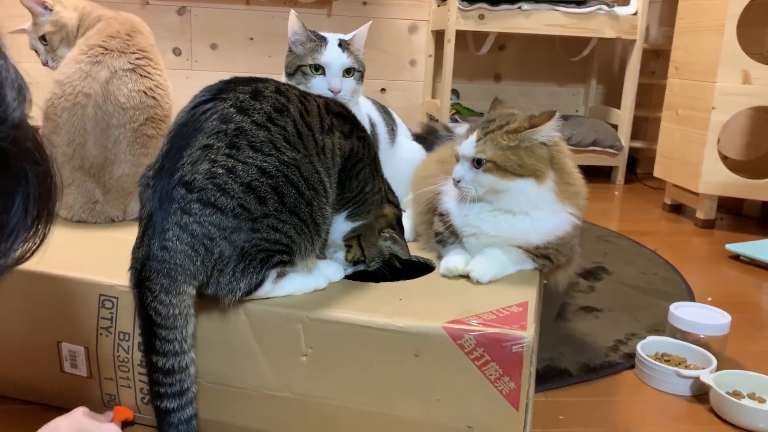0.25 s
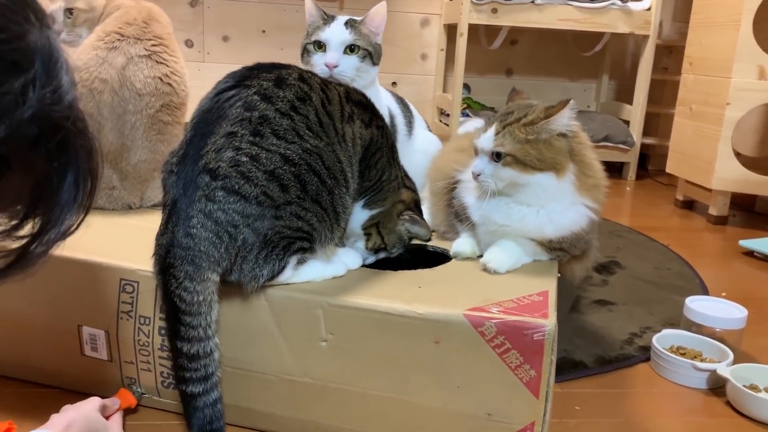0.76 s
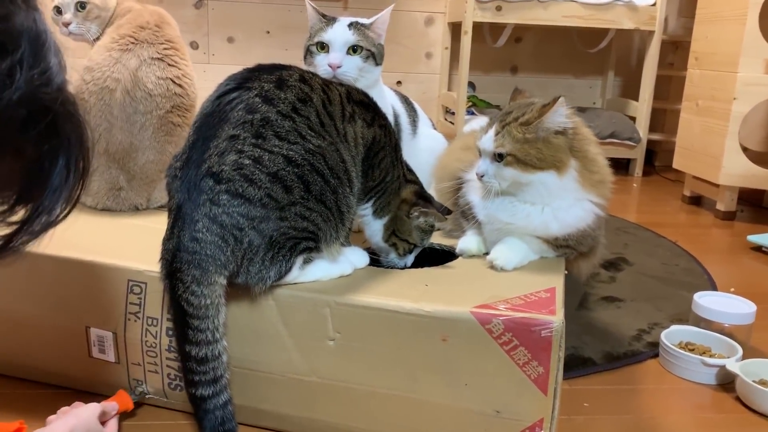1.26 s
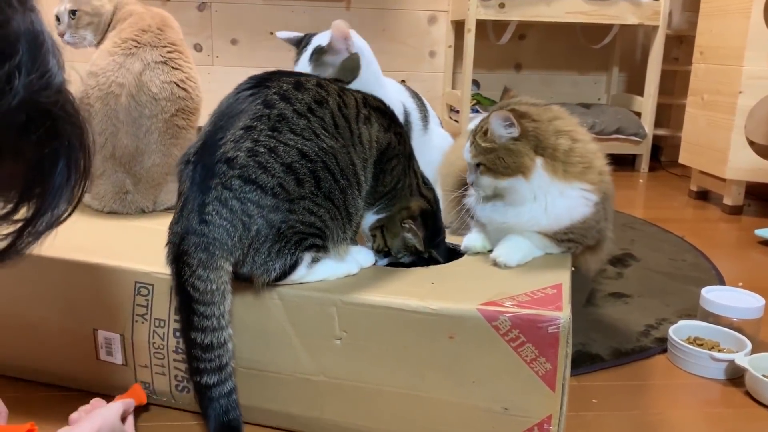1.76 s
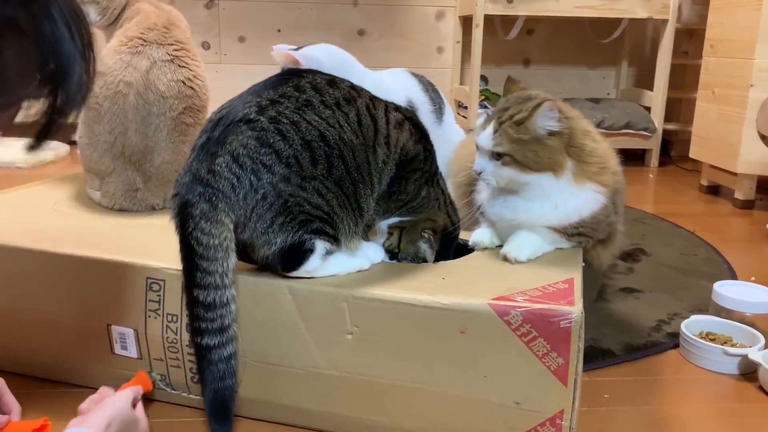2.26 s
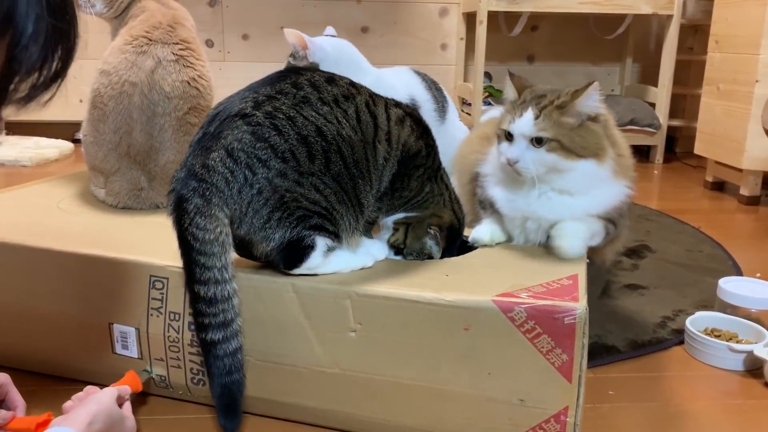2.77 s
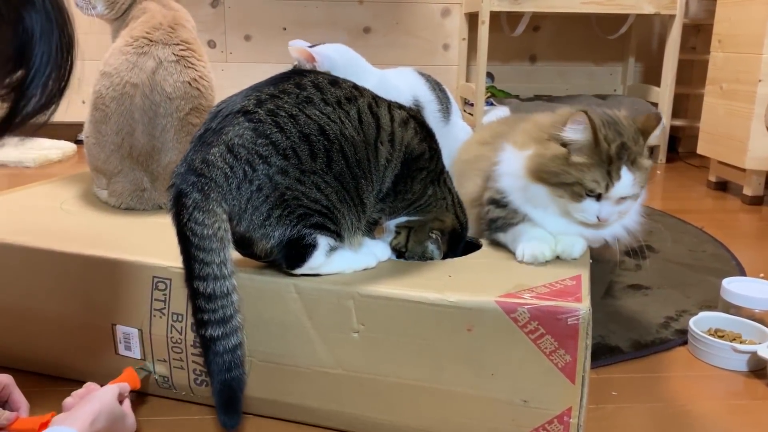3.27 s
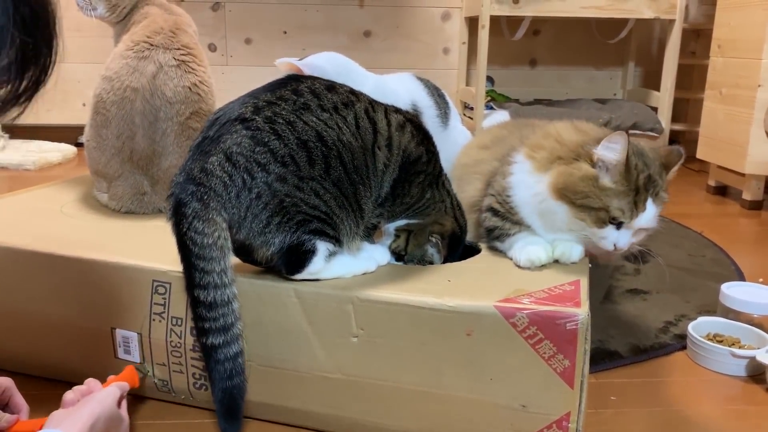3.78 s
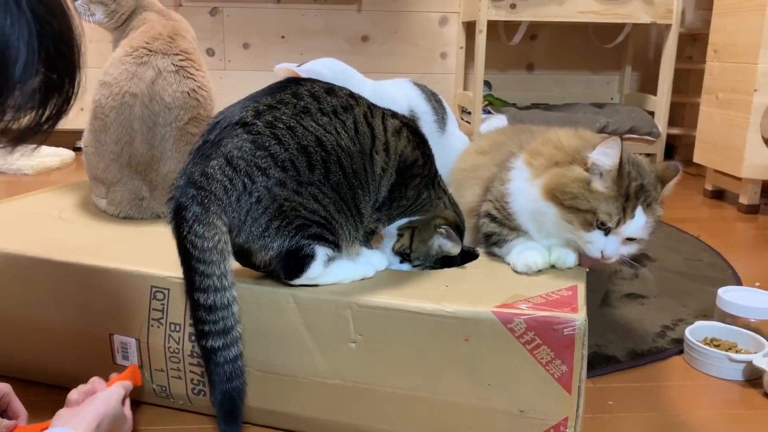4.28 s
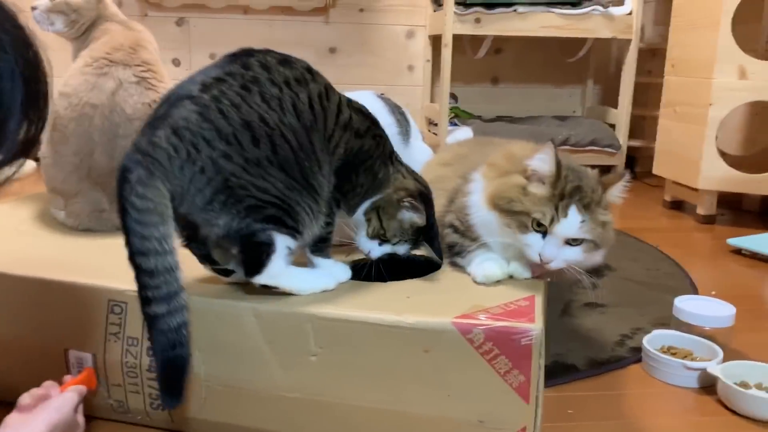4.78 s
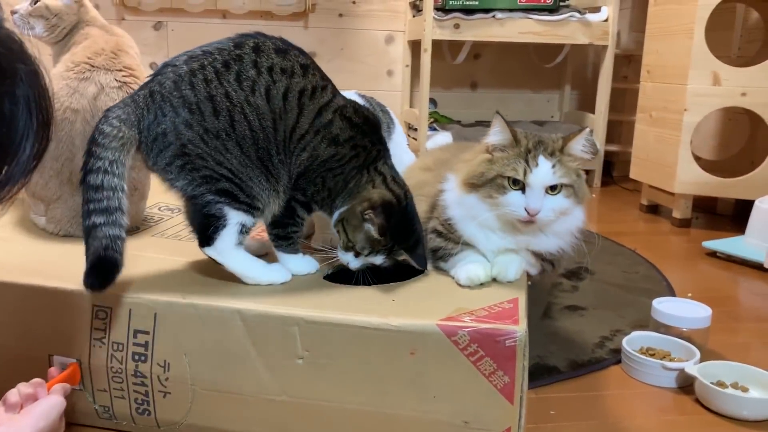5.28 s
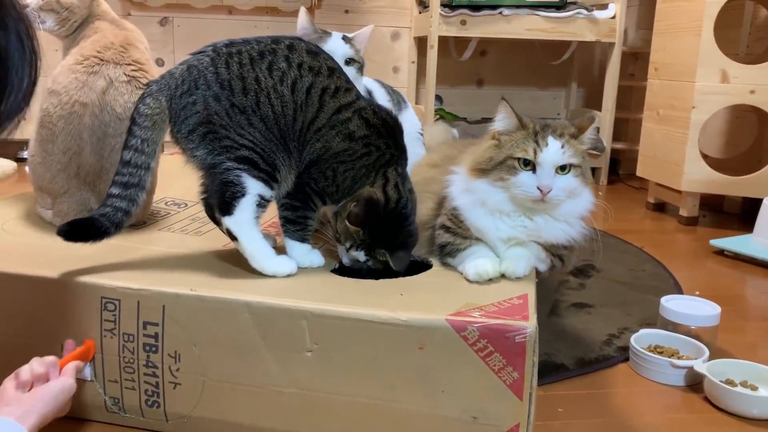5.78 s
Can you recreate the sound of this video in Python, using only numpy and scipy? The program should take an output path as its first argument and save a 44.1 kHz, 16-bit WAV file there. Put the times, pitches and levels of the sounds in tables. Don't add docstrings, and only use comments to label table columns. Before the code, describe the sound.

A toy wand poked into a large cardboard box is dragged to and fro over its ribs in short irregular strokes. Each gives a quick rasping zip with papery hiss; snags pop, fibres snap, and the hollow box booms underneath. Thuds against the wall grow frequent after the first second. Close stereo microphone, small wooden room with faint reverberation, light brushing and soft room noise.

```python
import sys
import numpy as np
from scipy import signal
from scipy.fft import rfft, irfft, next_fast_len
from scipy.io import wavfile
from scipy.ndimage import uniform_filter1d, map_coordinates

SR = 44100
rng = np.random.default_rng(int(sys.argv[2]) if len(sys.argv) > 2 else 0)


def attenuation_scalar(level_db):
    decades = np.asarray(level_db, float) / 20
    return 10 ** decades


def wav_record(signal):
    frames = np.transpose(np.atleast_2d(signal))
    bounded = np.clip(frames, -1, 1)
    quanta = np.round(bounded * 32767).astype(np.int16)
    wavfile.write(sys.argv[1], SR, quanta)


N = 266364


def unit(x):
    return x / np.sqrt(np.mean(x ** 2) + 1e-20)


def along(points, hz):
    f, v = np.transpose(points)
    return np.interp(np.log(hz + 1), np.log(f + 1), v)


def curves(rows):
    s, *cols = np.transpose(rows)
    return [np.interp(np.arange(N) / SR, s, c) for c in cols]


def wobble(rate):
    return map_coordinates(rng.standard_normal(N // 40), [np.arange(N) * rate / SR])


def filtered(x, response):
    m = next_fast_len(N + SR // 2)
    hz = np.fft.rfftfreq(m, 1 / SR)
    return irfft(rfft(x, m) * response(hz), m)[..., :N]


def modes(table):
    def response(f):
        total = 0
        for k, (centre, width, db) in enumerate(table):
            damping = 1j * f * width
            total = total + (-1) ** k * attenuation_scalar(db) * damping / (centre ** 2 - f ** 2 + damping)
        return total
    return response


def colour(spectrum):
    return lambda hz: attenuation_scalar(along(spectrum, hz))


def driven(force, level_db, response):
    return filtered(force * attenuation_scalar(level_db), response) / np.std(filtered(force, response))


def spikes(times, dbs):
    x = np.zeros(N)
    x[np.round(np.asarray(times) * SR).astype(int)] = attenuation_scalar(dbs) * rng.choice([-1, 1], len(times))
    return x


# (frequency [Hz], level [dB per Hz])
ROOM_TONE = [(18, -34), (30, 6), (109, -4), (1070, -27.5), (2900, -41), (9710, -47), (14800, -38),
             (16000, -54)]
# (frequency [Hz], level [dB])
PAPER_COLOUR = [(1200, 3), (1900, 0), (2700, -4.5), (4800, -5.5), (5800, -2.5), (7800, -4), (10000, 2),
                (11700, -4.5), (15500, -5.5)]
# (time [s], level [dB])
BRUSH_LEVEL = [(0.0, -63), (0.16, -44), (0.3, -48.5), (0.92, -50), (0.95, -75), (1.05, -52), (1.408, -57.5),
               (1.956, -54), (2.188, -43), (2.58, -47.5), (2.63, -80.5), (3.08, -57), (3.45, -53.5),
               (3.7, -56), (4.4, -67), (4.49, -52.5), (5.42, -60.5), (6.04, -59.5)]


def background():
    flutter_db = np.clip(7.0 * wobble(33), -5, 5)
    brushing = driven(rng.standard_normal(N), curves(BRUSH_LEVEL)[0] + flutter_db, colour(PAPER_COLOUR))
    return brushing + driven(rng.standard_normal(N), -41, colour(ROOM_TONE))


# (peak time [s], level [dB])
AIR_SHOVES = [(0.0, -21.5), (0.15, -23.5), (0.3, -20.5), (0.479, -21.5), (0.67, -27), (0.8, -32.5),
              (1.1, -20.5), (1.33, -26.5), (1.44, -17), (1.61, -24), (1.77, -22.5), (2.02, -21), (2.2, -25),
              (2.32, -20), (2.56, -30.5), (2.76, -20), (3.041, -26.5), (3.35, -36), (3.5, -23.5),
              (3.59, -18.5), (3.831, -28), (4.05, -20.5), (4.15, -26), (4.39, -31), (4.58, -21),
              (4.93, -23), (5.21, -22), (5.5, -21), (5.76, -18), (6.04, -17.5)]


def boom():
    swell_db_per_s, ring_db_per_s, die_db_per_s2 = 340, 60, 406
    s, db = np.transpose(AIR_SHOVES)[:, :, None]
    coarse = np.arange(0, N, 64)
    since = coarse / SR - s
    decay_db = -ring_db_per_s * since - die_db_per_s2 * since ** 2
    level_db = db + np.where(since < 0, swell_db_per_s * since, decay_db)
    level = np.interp(np.arange(N), coarse, attenuation_scalar(level_db.max(axis=0)))
    pitch_hz = 57 + 2 * wobble(12)
    tone = np.sqrt(2) * np.sin(2 * np.pi * np.cumsum(pitch_hz) / SR)
    shake = driven(rng.standard_normal(N), 0, modes([(41.0, 10.5, 0)]))
    return level * (tone + 0.41 * shake)


# (time [s], peak level [dB])
WALL_SLAPS = [(0.781, -20), (1.075, -21), (1.425, -12), (1.723, -8.5), (1.995, -10), (2.346, -6.5),
              (2.711, -23), (2.757, -9), (3.014, -37), (3.104, -7.5), (3.334, -12), (3.47, -24),
              (3.569, -8.5), (3.849, -11), (4.026, -22), (4.123, -7), (4.569, -20), (4.928, -11),
              (5.116, -26), (5.177, -8), (5.518, -12), (5.732, -34), (5.774, -13.5)]


def slaps():
    s, db = np.transpose(WALL_SLAPS)
    return filtered(spikes(s, db + 47), modes([(107.3, 29.8, 2.67), (133.3, 55.7, -1.7)]))


# (time [s], peak level [dB])
FIBRE_SNAPS = [(0.0754, -18.5), (0.0922, -13), (0.195, -16), (0.3566, -26), (0.4589, -17), (1.0454, -21),
               (1.3668, -23), (1.5728, -19), (1.6826, -16), (1.9354, -30), (1.9789, -14), (2.154, -10.5),
               (2.2857, -12), (2.5861, -27.5), (2.7392, -18), (2.7788, -20.5), (2.7978, -26), (2.8514, -27),
               (4.0258, -18.5), (4.566, -45.5), (5.0097, -32), (5.1244, -13.5), (5.149, -14), (5.1817, -9),
               (5.2094, -15.5), (5.3889, -29), (5.6656, -33), (5.688, -16), (5.7326, -10), (5.9106, -37)]


def snaps():
    s, db = np.transpose(FIBRE_SNAPS)
    bursts = signal.lfilter([1], [1, -.993], np.abs(spikes(s, db - 5.5)))
    return bursts * driven(rng.standard_normal(N), 0, colour(PAPER_COLOUR))


# (frequency [Hz], width [Hz], level [dB])
PANEL_MODES = [
    (115.7, 53.8, 4),
    (220, 100, -0.5),
    (275.3, 104, 4),
    (330, 142.7, 2.5),
    (367, 26.5, 9),
    (488.5, 40, -1.5),
]
# (frequency [Hz], width [Hz], level [dB])
STIFF_MODES = [(624, 76, 6), (781.5, 73.6, 4), (847.5, 93.5, 3), (1068, 113, -1.5), (1388, 207, -9.5),
               (1970, 320, -19)]
# (time [s], panel peak [dB], sharpness [dB])
SNAGS = [(0.104, -4, 5), (0.195, 7, -24), (0.364, -5.5, 7), (0.469, 3, -9), (0.651, -8.5, 1),
         (0.782, -11, -7.5), (1.092, -11, -2.5), (1.39, -6.5, -3), (1.574, 3.5, 3), (1.689, -1, 2.5),
         (1.982, 0.5, -29), (2.153, -5, -8.5), (2.296, -2, 0.5), (3.254, 3.5, -5), (3.792, -5, 2),
         (4.027, -10, 5), (4.056, -8, 3), (4.349, -11, -23), (4.594, -1.5, -30), (4.625, -4, -28.5),
         (4.875, -3, -8), (4.891, 8, -1.5), (5.119, -3, -6), (5.182, -1, 0.5), (5.435, -3, -13),
         (5.457, -9, -8.5), (5.494, 0, -25), (5.687, 4, 2), (5.708, 1, 4.5), (5.741, 1, 6)]


def jolts():
    s, db, sharp_db = np.transpose(SNAGS)
    db = np.minimum(db, -2)
    low = filtered(spikes(s, db + 30.5), modes(PANEL_MODES))
    high = filtered(spikes(s, db + sharp_db + 24), modes(STIFF_MODES))
    return uniform_filter1d(low + high, size=9)


def course(rows, times, shape):
    stiff_over_hiss_db, stiff_db_per_octave, usual_rib_hz = 12.5, -0.5, 280
    lifted_db = -120
    t = np.arange(0, N, 16) / SR
    approach, bite, release = times
    for s, hold, panel_db, hiss_db, rib_hz in rows:
        at = s + np.array([-approach, -bite, 0, hold, hold + release])
        octaves = np.log2(rib_hz / usual_rib_hz)
        stiff_db = hiss_db + stiff_over_hiss_db + stiff_db_per_octave * octaves
        levels = []
        for db, steps in zip((panel_db, stiff_db, hiss_db), shape):
            levels.append(np.interp(t, at, db + np.insert(steps, 2, 0), lifted_db, lifted_db))
        speed = np.insert(1.0 * np.array(shape[3]), 2, 1)
        yield levels + [rib_hz * np.interp(t, at, speed)]


# (bite time [s], hold [s], panel level [dB], paper hiss level [dB], ribs crossed [Hz])
JAB_STROKES = [(0.2, 0.02143, -18, -32, 350.9), (0.467, 0.038, -18.5, -34.5, 282.5),
               (0.785, 0.011, -21.5, -40, 197.3), (1.047, 0.03, -25, -46, 159.7),
               (1.222, .04, -22, -45.5, 260.7), (1.385, 0.056, -17.5, -38, 260),
               (1.688, 0.035, -14.5, -36, 300.5), (1.984, 0.024, -25.5, -35.5, 219.8),
               (2.298, 0.048, -17, -33, 330.8), (2.711, 0.13, -20.5, -45.5, 170),
               (3.013, .096, -18, -43.5, 199.9), (3.465, .04, -17, -46, 180),
               (4.03, 0.069, -12.5, -36.5, 321), (4.382, .03, -17.5, -34.5, 590),
               (4.578, .075, -13, -31.5, 362.9), (5.122, 0.09, -11.5, -36, 300.7),
               (5.692, 0.063, -10.5, -31.5, 300)]
# (full time [s], hold [s], panel level [dB], paper hiss level [dB], ribs crossed [Hz])
DRAG_STROKES = [(-0.02, .022, -19.5, -32.5, 164.9), (0.1, 0.028, -15.5, -29.5, 460),
                (0.232, 0.017, -15.5, -30.5, 430.4), (0.366, 0.025, -13, -31.5, 360.8),
                (0.64, 0.022, -15, -37.5, 211.4), (1.272, .028, -14.5, -33.5, 258.8),
                (1.582, .014, -13.5, -35.5, 304.6), (1.855, 0.023, -15, -39, 259),
                (2.185, 0.023, -11, -30, 255.4), (2.551, 0.024, -14, -40, 188),
                (3.259, 0.044, -12, -33.5, 248), (3.535, .03, -14.5, -37.5, 300),
                (3.794, 0.0164, -11.5, -34, 270.9), (4.352, .022, -15, -33.5, 418.9),
                (4.888, 0.026, -13, -32.5, 339), (5.44, .068, -12.5, -33, 326.8),
                (6.02, 0.024, -16, -39, 309)]
# (approach [s], bite [s], release [s])
JAB_TIMES = (.022, 0.00831, .045)
DRAG_TIMES = (.058, .014, .06)
JAB_SHAPE = [(-48, -22.5, 0, -26), (-34, -17.5, -1.5, -37), (-24, -9.5, 0, -23.5), (1, 1, 1.41, 1)]
DRAG_SHAPE = [(-22.5, -9.5, -0.5, -24), (-22, -6.5, -7.5, -50), (-18.5, -5, -4, -26), (1.02, 1.2, 1, 0.63)]


def strokes():
    jabs = course(JAB_STROKES, JAB_TIMES, JAB_SHAPE)
    drags = course(DRAG_STROKES, DRAG_TIMES, DRAG_SHAPE)
    each = np.array([*jabs, *drags])
    strongest = each[:, 2].argmax(axis=0)[None, None]
    now = np.take_along_axis(each, strongest, axis=0)[0]
    soft = uniform_filter1d(attenuation_scalar(now[:3]), size=20)
    now[:3] = 20 * np.log10(np.abs(soft) + 1e-7)
    return np.repeat(now, repeats=16, axis=1)[:, :N]


# (time [s], upper modes [dB], their highest modes [dB more],
# wall riding the ribs [dB], narrow panel modes [dB])
TIP_PLACE = [(0.0, 1, -1.5, 1.5, 3), (0.5, 2.5, -2, -3.5, -4.5), (0.8, 2, -2.5, -8, -1),
             (1.3, 5, 3, -3.5, 5), (1.6, 5.5, -2.5, -8, 3.5), (2.0, 4.5, -2, 3, 0),
             (2.5, -1.5, -1.5, -4, 2), (3.05, -2.5, 0.5, -0.5, 1), (3.3, 1, -1, -1.5, -4),
             (3.8, 0.5, -1, 0, -17), (4.08, 0, 4, 2, -4), (4.38, -1.5, 7, 1.5, 1), (4.62, -6, 9, 1, 2.5),
             (5.0, -3.5, 1, -1.5, -1.5), (5.5, -3, 1.5, -2.5, -1), (6.0, -1, -9, -4.5, 0)]
# (time [s], level [dB re hiss])
PAPER_SHEEN = [(0, -18), (2.5, -8.5), (3.3, -2.5), (4.6, -1.5), (5.3, -16)]


def scrape():
    panel_db, stiff_db, hiss_db, rib_hz = strokes()
    upper_db, highest_db, riding_db, narrow_db = curves(TIP_PLACE)
    turns = np.cumsum(rib_hz * (1 + .17 * wobble(140))) / SR
    height = attenuation_scalar(5.07 * wobble(150))
    plucks = unit(np.diff(np.floor(turns), prepend=0) * height)
    slip_moments = rng.random(N) < 1200 / SR
    slips = unit(slip_moments * rng.standard_normal(N) * attenuation_scalar(1.97 * wobble(90)))

    push = plucks + .5 * slips
    low = driven(push, panel_db - 4, modes(PANEL_MODES[:4]))
    low = low + driven(push, panel_db + narrow_db - 10.5, modes(PANEL_MODES[4:]))
    riding = attenuation_scalar(panel_db + riding_db - 6.5) * unit(height * np.sin(2 * np.pi * turns))

    force = 0.47 * plucks + slips
    high_db = stiff_db + upper_db
    high = driven(force, high_db - 2.5, modes(STIFF_MODES[:3]))
    high = high - driven(force, high_db + highest_db - 8.5, modes(STIFF_MODES[3:]))

    grip = 1 + 0.41 * np.cos(2 * np.pi * turns)
    grip = grip * attenuation_scalar(0.59 * wobble(46) + 0.78 * wobble(600))
    rasps = (rng.random(N) < 90 / SR) * rng.exponential(1.0, N)
    crackle = signal.lfilter([1], [1, -.985], rasps)
    rubbing = (grip + crackle) * rng.standard_normal(N) + 0.63 * slips
    hiss = driven(rubbing, hiss_db + 4.0, colour(PAPER_COLOUR))
    sheen_db = hiss_db + curves(PAPER_SHEEN)[0]
    sheen = driven(grip * rng.standard_normal(N), sheen_db, modes([(5640, 680, 0)]))
    return low + riding + high + hiss + sheen


# (frequency [Hz], 60 dB decay time [s])
ROOM_DECAY = [
    (60, 0.56),
    (400, 0.27),
    (2000, 0.36),
    (12000, 0.089),
]


def tail(t60_scale, count):
    hz, t, z = signal.stft(rng.standard_normal((count, SR // 2)), SR, nperseg=256)
    t60 = t60_scale * along(ROOM_DECAY, hz)[:, None]
    r = signal.istft(z * attenuation_scalar(-60 * t / t60), SR, nperseg=256)[1]
    return r / np.linalg.norm(r, axis=1, keepdims=True)


def moving(x, t60_scale, turns_hz):
    paths = signal.fftconvolve(x[None], tail(t60_scale, count=6), axes=1)[:, :N]
    share = np.array([wobble(turns_hz) for _ in paths])
    return (share * paths).sum(axis=0) / np.linalg.norm(share, axis=0)


# (frequency [Hz], correlation [0 to 1])
PORT_LIKENESS = [(100, .995), (400, .97), (800, .85), (1400, .55), (3100, .2), (4300, .55), (6400, .1),
                 (7400, .9995)]
# (frequency [Hz], left lead [rad])
PORT_LEAD = [(0, 0), (1100, 1.1), (1700, 2.5), (3200, 2.6), (4200, 5.9), (6000, 4.9), (6800, 7.5),
             (7800, 6.2), (9570, 3.19), (9850, 3.09), (13370, -3.09), (13670, -3.19), (15400, -6.27)]
# (frequency [Hz], left minus right [dB])
PORT_BALANCE = [(60, -1), (200, -1.7), (380, .3), (1200, 5.5), (4600, -1.5), (6600, 1.5), (7500, 0)]


def scene():
    near = scrape() + jolts() + snaps() + slaps()
    late = np.pad(near, (200, 0))
    direct = near + attenuation_scalar(-10.5) * moving(late, 0.86, turns_hz=4.5) + background()

    def turn(hz):
        return np.arccos(np.clip(along(PORT_LIKENESS, hz), -1, 1)) / 2

    def half(hz):
        lead = np.interp(hz, *np.transpose(PORT_LEAD))
        return attenuation_scalar(along(PORT_BALANCE, hz) / 2) * np.exp(.5j * lead)

    mid = filtered(direct, lambda hz: np.cos(turn(hz))) + boom()
    side = filtered(moving(direct, 0.071, turns_hz=12), lambda hz: np.sin(turn(hz)))
    ports = np.array([mid + side, mid - side])
    return filtered(ports, lambda hz: np.array([half(hz), 1 / half(hz)]))


def roll_off(x):
    return signal.sosfilt(signal.butter(12, 17010, fs=SR, output="sos"), x)


def record(dry):
    x = filtered(dry, lambda hz: (hz < 15750) * hz ** 2 / (hz ** 2 + 30 ** 2))
    x = x / (1 + np.abs(x / .98) ** 8) ** (1 / 8)
    return roll_off(x)


dry = scene()
out = record(dry)
wav_record(out)
```